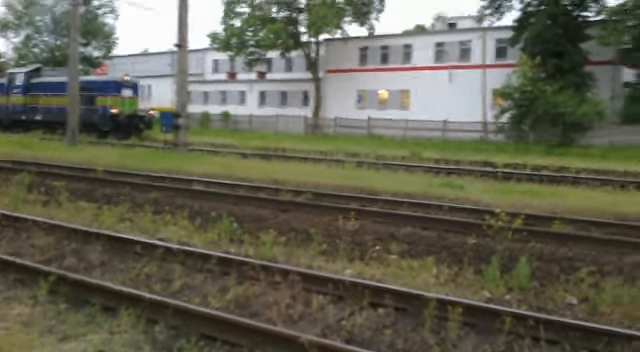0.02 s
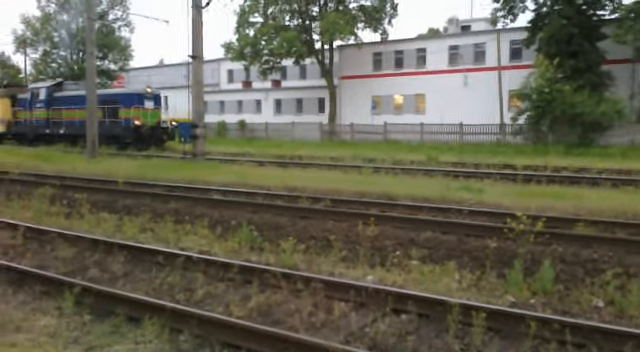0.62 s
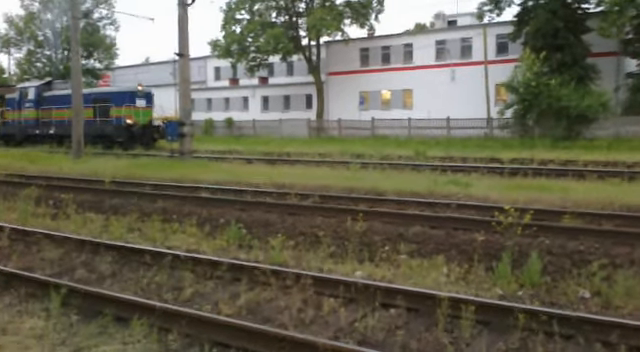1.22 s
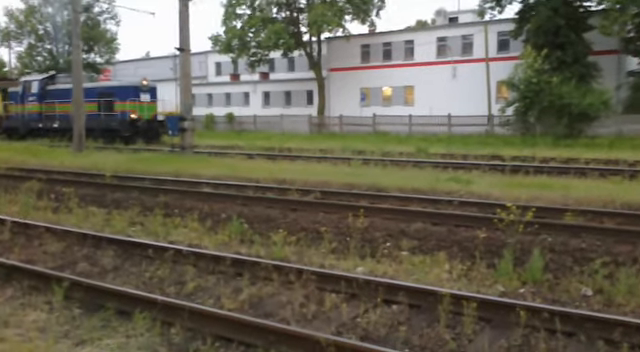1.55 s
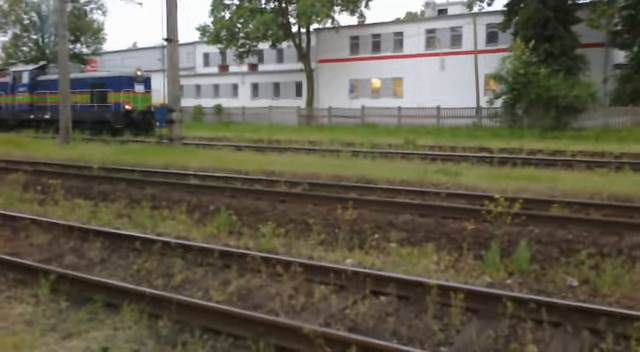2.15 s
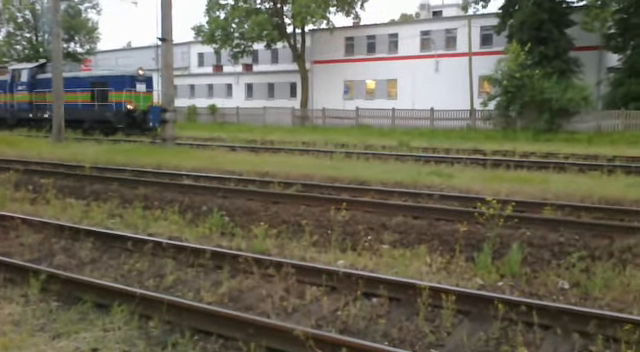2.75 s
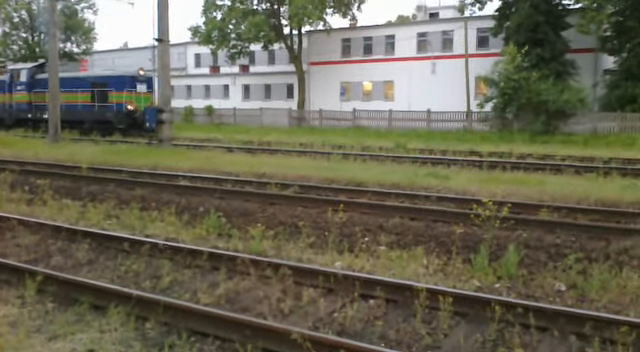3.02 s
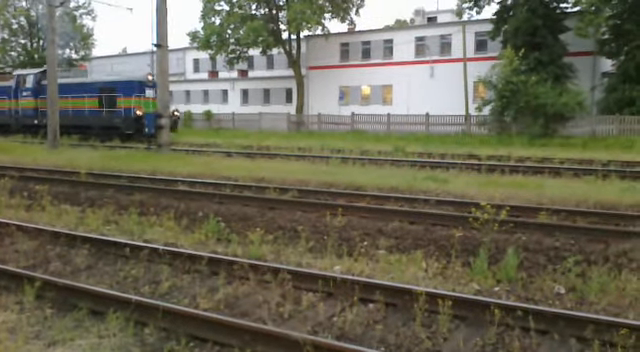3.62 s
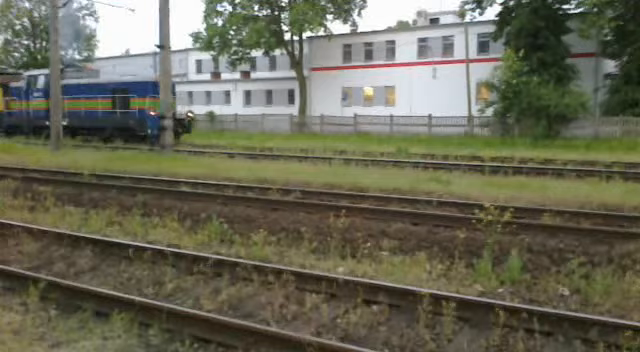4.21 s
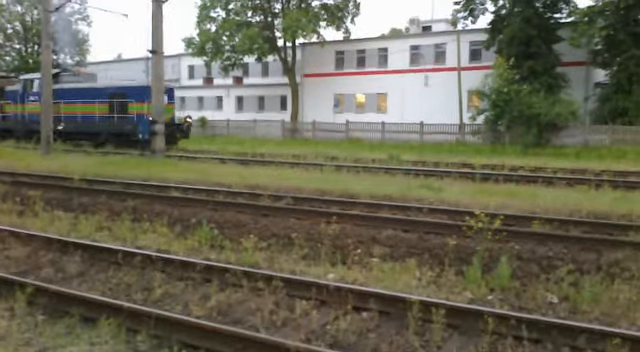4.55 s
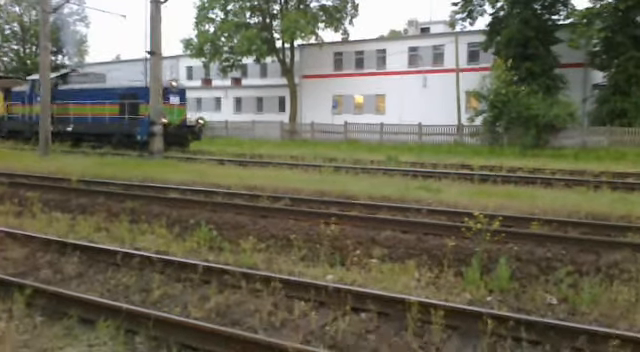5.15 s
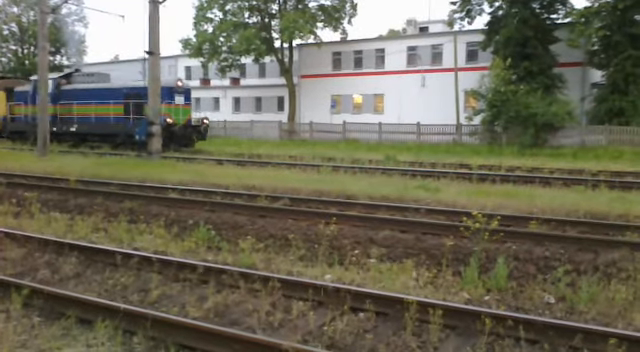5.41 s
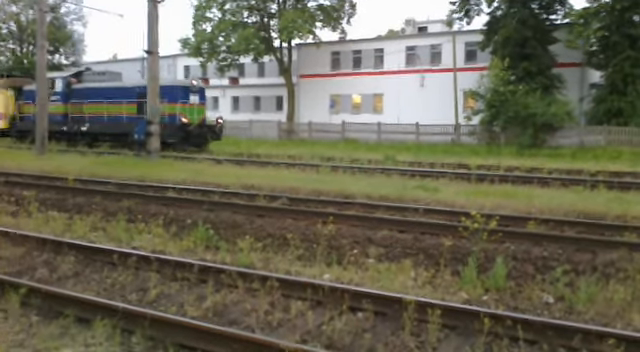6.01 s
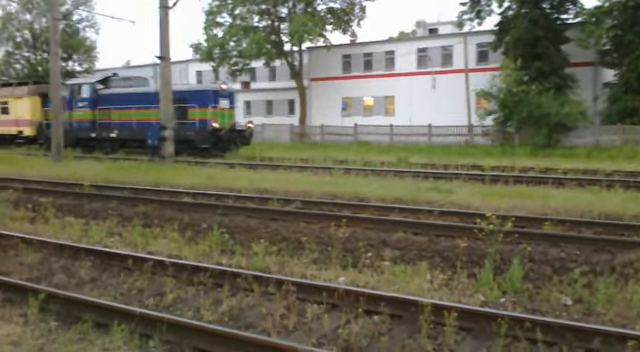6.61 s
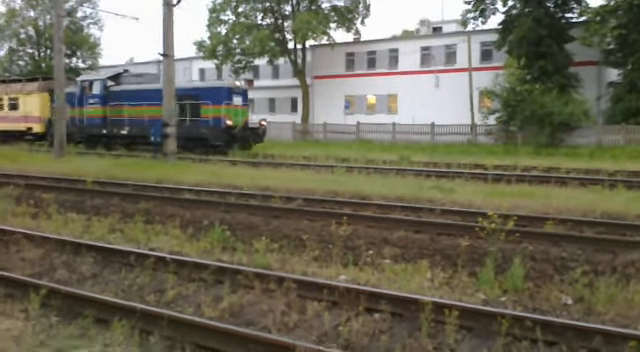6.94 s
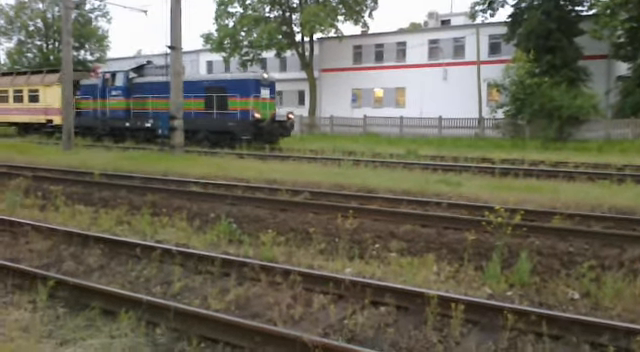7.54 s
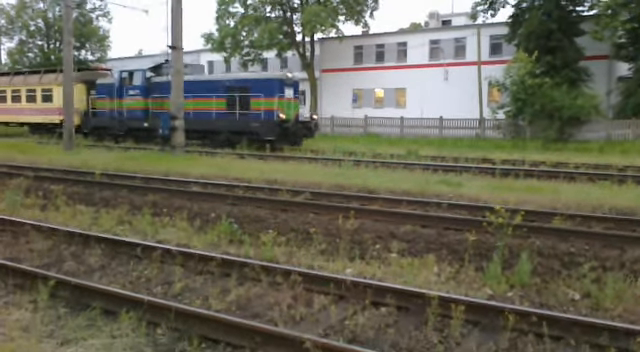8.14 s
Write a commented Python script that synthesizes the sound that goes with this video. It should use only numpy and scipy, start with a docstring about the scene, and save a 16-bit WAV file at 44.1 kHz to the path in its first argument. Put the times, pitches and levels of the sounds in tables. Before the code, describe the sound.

Gusty wind rumbles and thumps on the microphone while a diesel locomotive drones slowly nearer and small birds chirp faintly.

```python
"""Diesel shunter in a breezy yard.

A diesel locomotive draws its coaches slowly nearer: the engine drones and clatters, cooling fans rush,
the turbocharger runs down and winds up again, the gears whine. Gusts on a light breeze rumble on the
microphone and shed eddies that thump against it. Small birds chirp, pip and whistle from the trees,
with a short echo off the yard. Three tiny ticks sound close by."""
import sys
import numpy as np
from scipy import signal
from scipy.fft import rfft, irfft, next_fast_len
from scipy.io import wavfile
from scipy.ndimage import uniform_filter1d, map_coordinates

SR = 44100
rng = np.random.default_rng(int(sys.argv[2]) if len(sys.argv) > 2 else 0)


def bounce(signal):
    """Save signal as a 16-bit WAV file at the path given by the first command-line argument."""
    frames = np.transpose(np.atleast_2d(signal))
    limited = np.clip(frames, -1, 1)
    pcm = np.round(limited * 32767).astype(np.int16)
    wavfile.write(sys.argv[1], SR, pcm)


N = 364707

# engine (time [s], firing rate [Hz], drone [dB])
ENGINE_RUN = [(0, 52.17, -37), (1.4, 52.2, -46.5), (2, 52.12, -39), (4.5, 51.95, -43.5), (8.27, 52.66, -41)]
# drone partials (multiple of crankshaft rate, relative level [dB])
DRONE_ORDERS = [(6, 1), (12, -2.5), (24, -1), (37, -17), (42, -14)]
# locomotive noise (time [s], machinery [dB], fans [dB], hiss [dB])
NOISE_LEVELS = [(0, -46, -84, -56.5), (.32, -43, -61, -53), (1.15, -53, -69.5, -63),
                (1.76, -49.5, -66, -58), (2.24, -43.5, -62.5, -51.5), (2.96, -44, -59, -57),
                (3.2, -45.5, -61.5, -60), (4.2, -49.5, -63, -61.5), (4.8, -43, -56.5, -59),
                (5.5, -47.5, -56.5, -56.5), (6.24, -49, -56.5, -57), (6.88, -40.5, -52, -53),
                (7.36, -44.5, -55.5, -57.5), (8.26, -41, -53.5, -57)]
# noise spectra (frequency [Hz], relative density [dB])
MACHINERY_SPECTRUM = [(100, 5), (220, 6.5), (380, 8.5), (540, -1), (680, 3), (900, 6), (1100, 2),
                      (1350, -2), (1750, -4.5), (2150, -3), (2600, -10), (2950, -18), (5000, -41)]
FAN_SPECTRUM = [(600, -15), (1500, -4), (2200, -1.5), (3000, -4), (3600, 1), (4300, -10.5), (5500, -10.5),
                (7500, -12.5), (10500, -20.5), (13000, -37), (15600, -34)]
HISS_SPECTRUM = [(2800, -14), (3600, -5), (4300, 2.5), (4900, -1), (5500, 4.5), (6300, -2.5), (7000, -7),
                 (8000, -12), (9300, -11.5), (10800, -15.5), (11250, -13), (11700, -17), (13000, -23.5),
                 (15600, -50)]
RUMBLE_SPECTRUM = [(8, -39), (20, -5), (35, -2), (58, -3), (110, -11), (160, -19.5), (260, -27.5),
                   (600, -100)]
CHURN_SPECTRUM = [(50, -52), (110, 5), (170, 3.5), (260, -6), (400, -11.5), (600, -25.5), (900, -32.5),
                  (1500, -45), (3000, -110)]
# light air between gusts (time [s], rumble [dB])
BREEZE_LEVELS = [(0, -35), (.9, -31), (1.4, -40), (1.6, -33), (1.9, -37), (2.6, -33), (3.6, -30),
                 (4.5, -35), (5.05, -30), (5.55, -34.5), (6.3, -31), (6.7, -30), (7.3, -29), (8.27, -26.5)]
# gusts on the microphone (start [s], length [s], rumble [dB], churn [dB])
MIC_GUSTS = [(0.248, 0.1, -30, -31.5), (0.359, 0.12, -19.5, -26), (0.52, 0.086, -20, -27.5),
             (0.645, 0.037, -20, -20.5), (0.751, 0.01117, -19, -25), (0.789, 0.039, -21, -29),
             (0.886, 0.04402, -17.5, -24), (0.963, 0.11, -22.5, -27), (1.111, 0.2, -26, -33),
             (1.505, 0.036, -39, -33.0), (2.133, 0.19, -16.5, -23), (2.332, 0.13, -22, -31.5),
             (2.823, 0.048, -21.5, -29), (2.932, 0.076, -23.5, -33), (3.068, 0.023, -20.5, -28.5),
             (3.489, 0.047, -23.5, -28.5), (3.588, 0.066, -18.5, -29), (3.712, 0.16, -25, -33),
             (3.94, 0.085, -17, -27.5), (4.148, 0.023, -26.5, -34), (4.362, 0.032, -30, -34),
             (4.793, 0.083, -25.5, -29), (5.135, 0.0334, -17, -28), (5.271, 0.11, -20, -25.5),
             (5.664, 0.072, -17.5, -24.5), (5.828, 0.08, -25, -26), (6.026, 0.11, -21.5, -28),
             (6.463, 0.097, -21.5, -33), (6.896, 0.05, -24.5, -28.5), (7.02, 0.092, -23.5, -30.5),
             (7.109, 0.086, -14, -22.5), (7.477, 0.05, -18, -26.5), (7.825, 0.078, -28.5, -28.5),
             (8.178, 0.12, -21.5, -26)]
# buzzy bird chirps (start [s], level [dB])
BIRD_CHIRPS = [(.18, -61), (.33, -56), (.51, -57), (.68, -58), (.86, -66), (2.4, -62), (2.571, -61),
               (2.76, -62), (5.478, -60.5), (5.65, -58), (5.84, -62)]
# yard echo (frequency [Hz], T60 [s])
YARD_DECAY = [(200, .5), (2000, .5), (10000, 0.22)]
# close ticks (start [s], level [dB])
NEAR_TICKS = [(.229, -50), (.305, -59), (.33, -60)]
# strongest eddies at the microphone port (time [s], level [dB], centre [Hz])
BIG_EDDIES = [(.37, -2.5, 314), (.375, -5.5, 297), (.389, -10, 267), (.423, -9, 230), (.435, -10, 185),
              (.459, -10.5, 200), (.467, -9, 365), (.481, -11, 170), (.529, -11.5, 192), (.558, -20, 230),
              (.574, -16, 220), (.604, -19, 170), (.661, -11, 273), (.675, -6.5, 273), (.753, -10.5, 225.1),
              (.795, -13.5, 225.1), (.822, -4, 198), (.887, -13, 255.2), (.896, -6, 330), (.911, -6, 280),
              (.9133, -7, 646), (.924, -12, 320), (.982, -13, 278), (.999, -9.5, 258), (1.005, -9.5, 352),
              (1.022, -5, 380), (1.034, -19, 351), (1.045, -10.5, 250), (1.115, -9, 198), (1.138, -14, 214),
              (1.164, -13.5, 184.6), (1.52, -18, 220), (2.143, -8.5, 169), (2.173, -4.5, 287),
              (2.212, -7, 194), (2.229, -7.5, 265), (2.259, -11, 168), (2.273, -4, 254), (2.298, -5.5, 90),
              (2.369, -11, 198), (2.388, -12, 214), (2.422, -13.5, 162), (2.84, -12, 215),
              (2.951, -7, 177.8), (3.092, -2.5, 195.5), (3.094, -13.5, 543.3), (3.395, -15, 183),
              (3.425, -21, 260), (3.447, -8, 165), (3.46, -16, 215), (3.492, -11, 223), (3.597, -9, 229.5),
              (3.635, -11, 295.6), (3.726, -12.5, 228), (3.787, -19, 245), (3.821, -11.5, 223),
              (3.866, -8, 218), (3.944, -7.5, 330), (3.967, -10.5, 227), (3.981, -8.5, 268),
              (3.994, -18, 240), (4.009, -12, 249.6), (4.079, -10, 246), (4.152, -7, 212),
              (4.376, -15, 160), (4.795, -10.5, 206), (4.805, -17.5, 320), (4.826, -4, 207),
              (4.857, -14, 180), (4.902, -1, 315.8), (5.156, -6.5, 394), (5.159, -7, 480), (5.162, -3, 365),
              (5.212, -17, 213.3), (5.279, -8.5, 218), (5.289, -10.5, 150), (5.332, -11, 333.3),
              (5.368, -12.5, 196.9), (5.67, -8, 310.4), (5.705, -7.5, 322), (5.71, -11.5, 479),
              (5.836, -17, 310), (5.87, -5, 338), (5.875, -5.5, 272.2), (6.011, -15, 236),
              (6.065, -11, 170), (6.104, -9.5, 158.1), (6.907, -16, 215.2), (6.939, -5.5, 189),
              (7.081, -13.5, 195), (7.121, -8.5, 384.7), (7.141, -6.5, 408), (7.146, -7, 323),
              (7.161, -11, 195), (7.184, -9, 265), (7.447, -12, 316.9), (7.491, -7.5, 205),
              (7.505, -15, 235), (7.518, -12.5, 310), (7.866, -13, 210), (8.18, -11, 282),
              (8.224, -14, 262), (8.262, -15, 285)]
# port response to a thump (frequency [Hz], gain [dB])
PORT_RESPONSE = [(60, 2.5), (400, -3.5), (700, -2.5), (1200, -1.5), (1800, -1), (3000, 4), (3600, -32),
                 (4500, -50)]
# turbocharger (time [s], whine [Hz], whine at full load [dB], breathy octave [dB])
TURBO_RUN = [(1.2, 2250, -76, -85), (1.55, 2120, -63, -80), (1.9, 1850, -60, -78), (2.5, 1400, -72, -72),
             (3, 1450, -68, -72), (3.7, 1590, -62, -69), (4.2, 1660, -64, -66.5), (4.75, 1713, -60, -67.5),
             (5.2, 1743, -63.5, -67), (5.9, 1779, -59, -70), (6.55, 1802, -62, -67),
             (6.9, 1845, -63.5, -63), (7.4, 1955, -61, -66), (7.62, 2010, -58.5, -70),
             (7.79, 2050, -51.5, -71), (7.92, 2085, -60, -68), (8.2, 2146, -53, -70)]
# transmission (time [s], whine [Hz], level [dB])
GEAR_RUN = [(0, 770, -99), (3.5, 815, -56), (4.4, 820, -53), (6.4, 810, -57), (8.27, 821, -63)]
# high bird pips (time [s], level [dB])
BIRD_PIPS = [(4.784, -53), (4.908, -56), (5.003, -53), (5.035, -53), (5.091, -53), (5.152, -51),
             (5.181, -60)]

TIME_S = np.arange(N) / SR


def amp(db):
    """Decibels to gain."""
    return 10 ** (np.asarray(db) / 20)


def unit(x):
    """x at rms 1."""
    return x / np.sqrt(np.mean(x ** 2) + 1e-20)


def along(points, hz):
    """(Hz, value) points read on a log axis."""
    knots_hz, values = np.transpose(points)
    return np.interp(np.log(hz + 1), np.log(knots_hz + 1), values)


def curves(rows):
    """Per-sample curve for each column after the time."""
    times_s, *columns = np.transpose(rows)
    return [np.interp(TIME_S, times_s, column) for column in columns]


def wobble(rate_hz):
    """Smooth random curve, rate_hz knots a second."""
    return map_coordinates(rng.standard_normal(8192), [TIME_S * rate_hz], mode="wrap")


def phase_rad(hz):
    """Running phase of a changing frequency."""
    return 2 * np.pi * np.cumsum(hz) / SR


def filtered(x, response):
    """x through a gain given as a function of Hz."""
    size = next_fast_len(N + SR // 2)
    return irfft(rfft(x, size) * response(np.fft.rfftfreq(size, 1 / SR)), size)[:N]


def coloured(x, spectrum):
    """x shaped by a spectrum, at rms 1."""
    return unit(filtered(x, lambda hz: amp(along(spectrum, hz))))


def levelled(x, window=2600):
    """x held near rms 1 over each window of samples."""
    power = uniform_filter1d(uniform_filter1d(x * x, window), window // 2)
    return x / np.sqrt(np.abs(power) + 1e-9)


def rush(spectrum, drift_db):
    """Noise at rms 1 whose bands drift in level on the way through the air."""
    bands = signal.stft(rng.standard_normal(N), nperseg=1024)[2]
    drift = uniform_filter1d(rng.standard_normal(bands.shape), size=5, axis=0)
    drift = unit(uniform_filter1d(drift, size=16, axis=1))
    return coloured(signal.istft(bands * amp(drift_db * drift), nperseg=1024)[1][:N], spectrum)


def diesel(firings_per_turn=6, waver_db=1.3, sway_db=1.58):
    """The exhaust drones, machinery clatters at each firing, cooling air rushes out."""
    firing_hz, drone_db = curves(ENGINE_RUN)
    machinery_db, fan_db, hiss_db = curves(NOISE_LEVELS)
    firing_rad = phase_rad(firing_hz * (1 + .005 * wobble(29)))  # governed: nearly steady
    crank_rad = firing_rad / firings_per_turn
    drone = 0
    for order, db in DRONE_ORDERS:
        gain = amp(db + waver_db * wobble(7.6))
        drone += gain * np.sin(order * crank_rad + rng.uniform(0, 2 * np.pi))
    chug = np.cos(firing_rad / 2)  # the two cylinder banks differ
    beat = 1 + .041 * np.cos(firing_rad) + .026 * chug
    machinery = amp(machinery_db) * beat * rush(MACHINERY_SPECTRUM, drift_db=2.2)
    fans = amp(fan_db + .98 * wobble(35)) * rush(FAN_SPECTRUM, drift_db=1.5)
    hiss = amp(hiss_db + np.tanh(wobble(45))) * (1 + .16 * chug) * rush(HISS_SPECTRUM, drift_db=1.5)
    sway = amp(sway_db * unit(wobble(9) + wobble(30)))  # gusty air carries sound unevenly
    return amp(drone_db) * unit(drone) + sway * machinery + fans + hiss


def gust(start_s, length_s, rise_s, fall_s):
    """Rise, hold and fall of one gust, as a share of full power."""
    t = TIME_S - start_s
    return np.exp(-2 * np.maximum(-t / rise_s, (t - length_s) / fall_s).clip(0, 20))


def wind_levels_db(breeze_churn_db=-11):
    """Rumble and churn levels at the port: breeze and gusts add in power."""
    breeze_db, = curves(BREEZE_LEVELS)
    rumble, churn = amp(breeze_db) ** 2, amp(breeze_db + breeze_churn_db) ** 2
    for start_s, length_s, rumble_db, churn_db in MIC_GUSTS:
        rumble += amp(rumble_db) ** 2 * gust(start_s, length_s, rise_s=.019, fall_s=.039)
        churn += amp(churn_db) ** 2 * gust(start_s, length_s, rise_s=.008, fall_s=.01)
    return 10 * np.log10(rumble), 10 * np.log10(churn)


def buffeting(rumble_db, churn_db, rumble_lumps_db=3, churn_lumps_db=7.5, usual_churn_db=-29):
    """Turbulence sweeps past the port; faster air churns louder and higher."""
    lumps = unit(wobble(110) + .8 * wobble(55))
    rumble = levelled(coloured(rng.standard_normal(N), RUMBLE_SPECTRUM) * amp(rumble_lumps_db * lumps))
    speed = np.exp(.017 * (churn_db - usual_churn_db) + .09 * lumps)
    turbulence = coloured(rng.standard_normal(N), CHURN_SPECTRUM)
    swept = map_coordinates(turbulence, [np.cumsum(speed)], mode="wrap")
    churn = levelled(swept * amp(churn_lumps_db * lumps))
    surge_db = 3 * np.tanh(wobble(36))
    return amp(rumble_db + surge_db) * rumble + amp(churn_db + surge_db) * churn


def chirps(centre_hz=6900, sweep_hz=550, buzz_hz=70, rasp_hz=330, length_s=.1):
    """A bird sweeps its pitch up and down fast enough to buzz."""
    sweep = np.sin(phase_rad(buzz_hz * (1 + .19 * wobble(40))))
    buzz = np.sin(phase_rad(centre_hz + sweep_hz * sweep + rasp_hz * wobble(700)))
    envelope = 0
    for start_s, db in BIRD_CHIRPS:
        progress = np.clip((TIME_S - start_s) / length_s, 0, 1)
        envelope += amp(db) * np.sqrt(2 * np.abs(np.sin(np.pi * progress)))
    return envelope * buzz


def yard_echo(x):
    """Walls and trees return a short diffuse tail."""
    hz, t, bands = signal.stft(rng.standard_normal(SR // 2), SR, nperseg=256)
    decay = amp(-60 * t / along(YARD_DECAY, hz)[:, None])
    tail = signal.istft(bands * decay, SR, nperseg=256)[1]
    return signal.fftconvolve(x, tail / np.linalg.norm(tail))[:N]


def ticks(decay_s=.0049):
    """Very short bursts of top treble."""
    bursts = sum(amp(db) * (TIME_S > s) * np.exp(-np.abs(TIME_S - s) / decay_s) for s, db in NEAR_TICKS)
    return bursts * coloured(rng.standard_normal(N), [(5000, -20), (11500, 0), (15600, -10)])


def small_eddies(churn_db, rate_hz=45, centre_hz=235, offset_db=-1, scatter_db=3):
    """Gusts shed eddies at random, as strong as the churn: (time [s], level [dB], centre [Hz])."""
    gap, strength, pitch = rng.standard_normal((600, 3)).T
    times_s = np.cumsum(np.exp(.4 * gap)) / rate_hz
    in_gust = np.any([(times_s > s) & (times_s < s + span_s) for s, span_s, *_ in MIC_GUSTS], axis=0)
    db = np.interp(times_s, TIME_S, churn_db) + offset_db + scatter_db * strength
    return np.column_stack([times_s, db, centre_hz * np.exp(.14 * pitch)])[in_gust]


def swing(t, hz, phase_turns):
    """One pressure swing centred on t = 0."""
    return np.real(np.exp(2j * np.pi * phase_turns) / (1 - 1j * np.pi * hz * t) ** 3)


def thumps(eddies, push_db=-10, push_stretch=3.5, wake_db=-13, wake_s=.00329):
    """Each eddy hits the port: a pressure swing on a broader push, then a weaker swing in its wake."""
    out, t = np.zeros(N + SR), np.arange(-2048, 2048) / SR
    for (time_s, db, hz), (turns, wake_turns, lag) in zip(eddies, rng.random((600, 3))):
        push = amp(push_db) * swing(t / push_stretch, hz, turns)
        wake = amp(wake_db) * swing(t - wake_s * (.5 + lag), hz, wake_turns)
        start = round(time_s * SR) - len(t) // 2
        out[start:start + len(t)] += amp(db) * (swing(t, hz, turns) + push + wake)
    return filtered(out[:N], lambda hz: amp(along(PORT_RESPONSE, hz)))


def whine(hz, width_hz, purity):
    """A tone blurred into narrow-band noise; purity 0 is all noise."""
    phase = phase_rad(hz)
    return unit((purity + wobble(width_hz)) * np.cos(phase) + wobble(width_hz) * np.sin(phase))


def turbocharger(load_ramp_s=(2, 4.6), skirt_db=-6):
    """A breathy octave; the whine below it fades in with engine load, while its skirt of rushing air eases off
    as load rises."""
    hz, whine_db, octave_db = curves(TURBO_RUN)
    load = np.interp(TIME_S, load_ramp_s, [0, 1])
    wavering_hz = hz * (1 + .004 * wobble(70))
    tone = load * whine(wavering_hz, width_hz=80, purity=1.8)
    skirt = amp(skirt_db * load) * whine(hz, width_hz=300, purity=0)
    fundamental = amp(whine_db + wobble(20)) * (tone + skirt)
    octave = amp(octave_db + wobble(20)) * whine(2 * wavering_hz, width_hz=180, purity=0)
    return fundamental + octave


def gears():
    """The transmission sings a rough tone."""
    hz, db = curves(GEAR_RUN)
    return amp(db) * whine(hz, width_hz=110, purity=1)


def pips(pitch_hz=7170, half_width_s=.0057):
    """Another bird gives short pips on one pitch."""
    envelope = sum(amp(db) * np.exp(-((TIME_S - s) / half_width_s) ** 2) for s, db in BIRD_PIPS)
    return envelope * np.sin(phase_rad(pitch_hz + 30 * wobble(200)))


def whistle(start_s=7.61, length_s=.387, attack_s=.0056, fade_s=.024, held_db=-57, swell_db=5,
            held_hz=6480, glide_hz=1450, glide_s=.036, trill_hz=148, trill_depth_hz=290):
    """A bird glides up to a held note that swells into an uneven trill."""
    t = np.clip(TIME_S - start_s, 0, length_s)
    progress = t / length_s
    trill = np.sin(phase_rad(trill_hz * (1 + .3 * wobble(120))))
    hz = held_hz - glide_hz * np.exp(-t / glide_s) + trill_depth_hz * progress ** 5 * trill
    gate = np.clip(np.minimum(t / attack_s, (length_s - t) / fade_s), 0, 1)
    db = held_db + swell_db * progress ** 2 + 1.53 * wobble(38)
    return gate * amp(db) * np.sin(phase_rad(hz + 35 * wobble(25)))


def scene(echo_db=-3.5):
    """Train and birds far off, wind at the microphone."""
    train = diesel() + turbocharger() + gears()
    birds = chirps() + pips() + whistle()
    rumble_db, churn_db = wind_levels_db()
    wind = buffeting(rumble_db, churn_db) + thumps(BIG_EDDIES) + thumps(small_eddies(churn_db))
    return (train + birds + amp(echo_db) * yard_echo(birds) + wind + ticks())[None]


def record(dry, ceiling=.93, fade_s=.003, low_hz=20, top_hz=15700):
    """The microphone rounds off the strongest thumps and limits the band."""
    rounded = dry[0] / (1 + np.abs(dry[0] / ceiling) ** 6) ** (1 / 6)
    fades = np.minimum(np.minimum(TIME_S, TIME_S[::-1]) / fade_s, 1)
    return filtered(rounded * fades, lambda hz: (hz < top_hz) * np.minimum(hz / low_hz, 1) ** 2)[None]


dry = scene()
out = record(dry)
bounce(out)
```